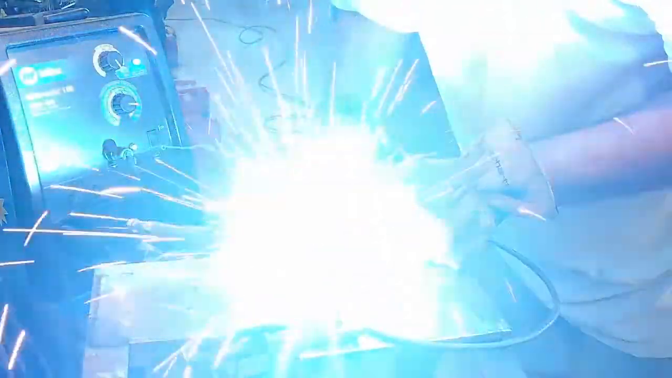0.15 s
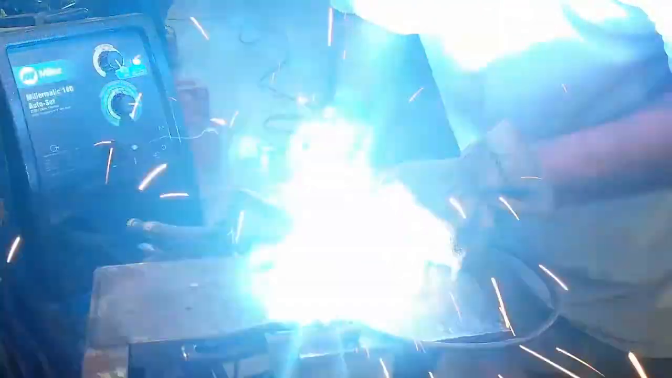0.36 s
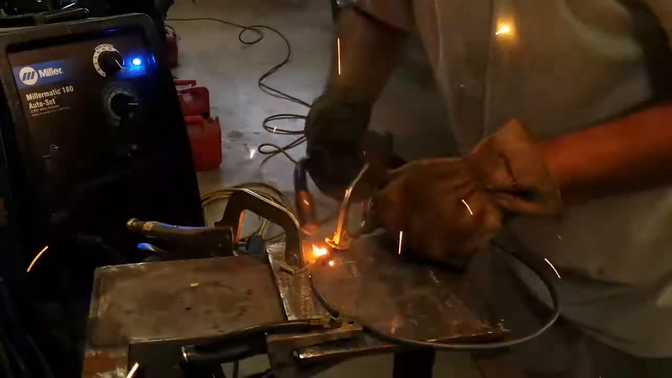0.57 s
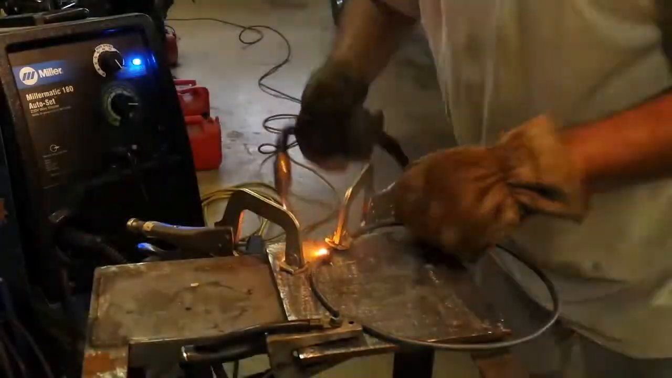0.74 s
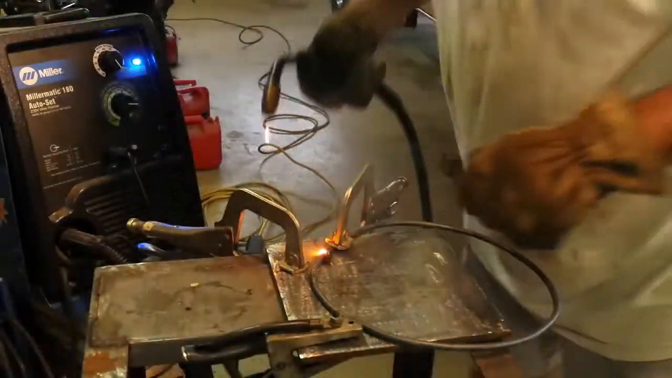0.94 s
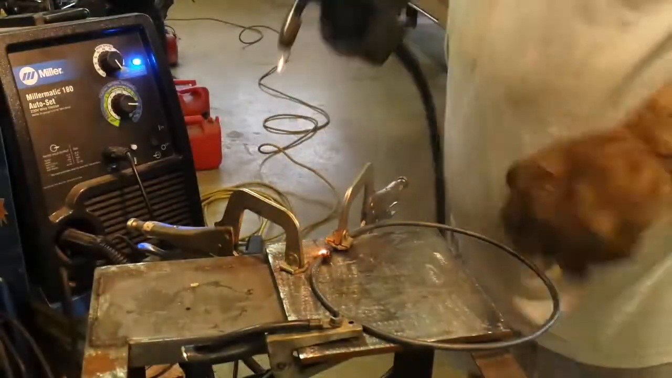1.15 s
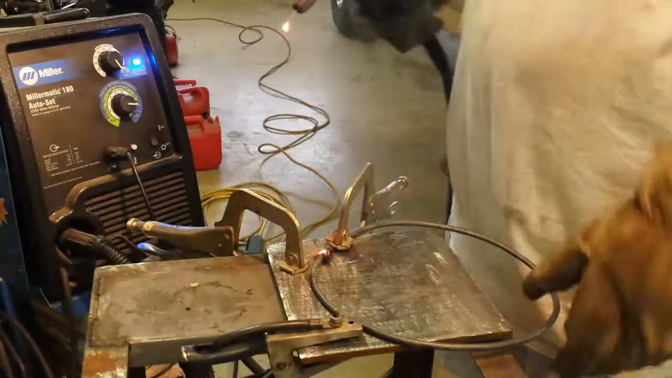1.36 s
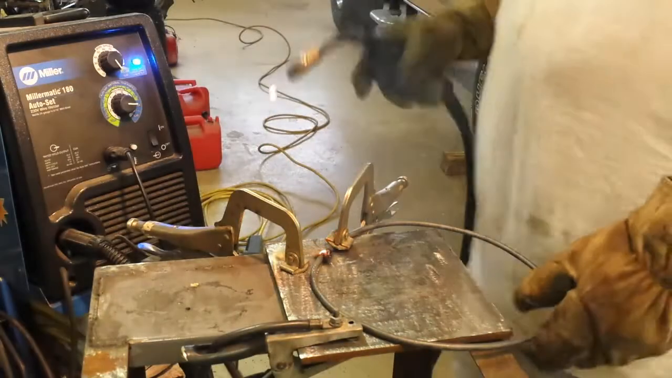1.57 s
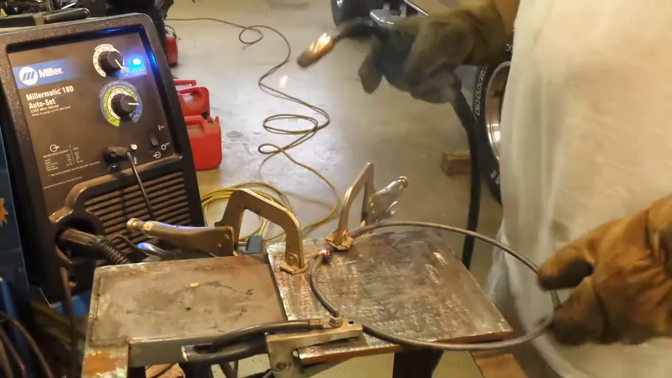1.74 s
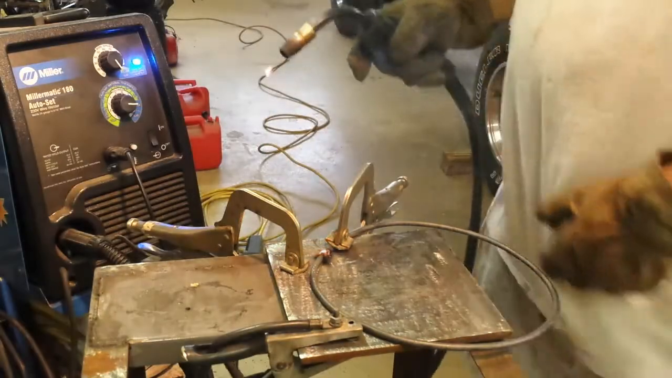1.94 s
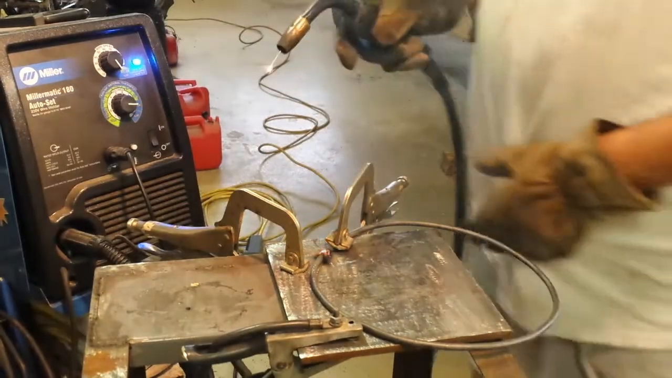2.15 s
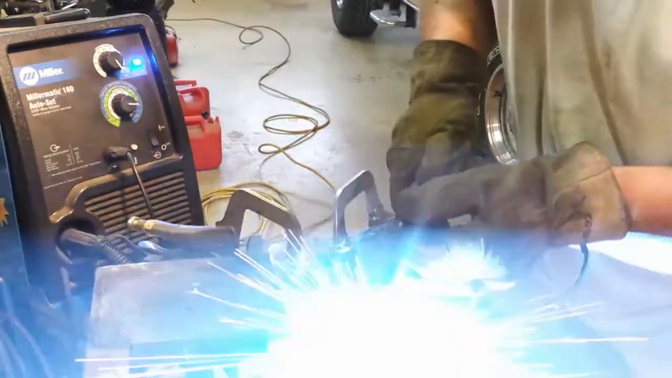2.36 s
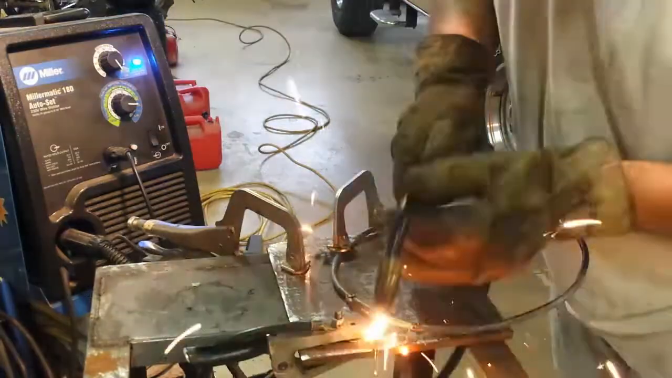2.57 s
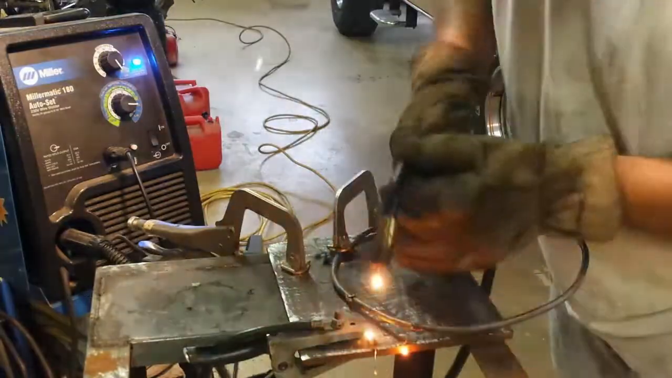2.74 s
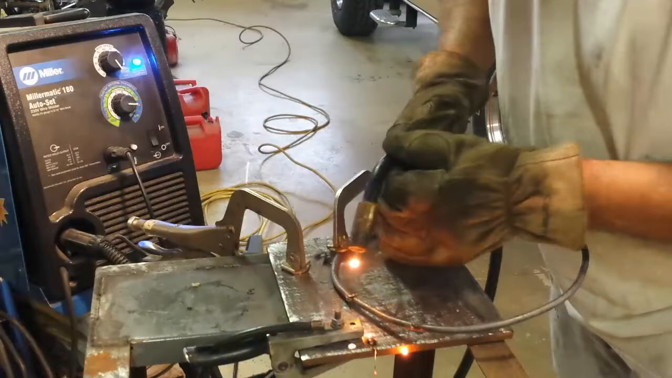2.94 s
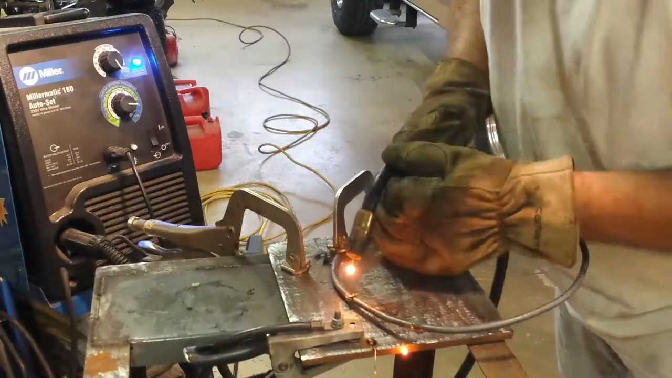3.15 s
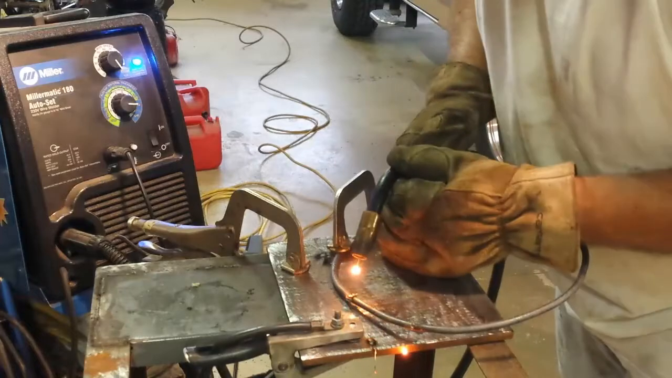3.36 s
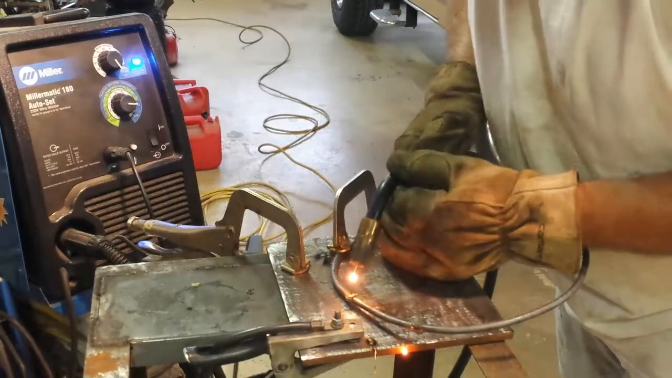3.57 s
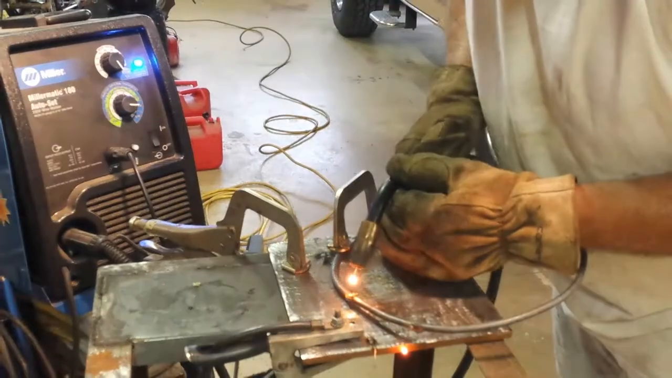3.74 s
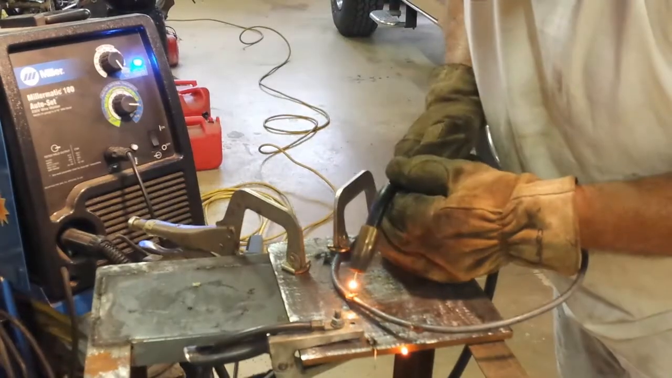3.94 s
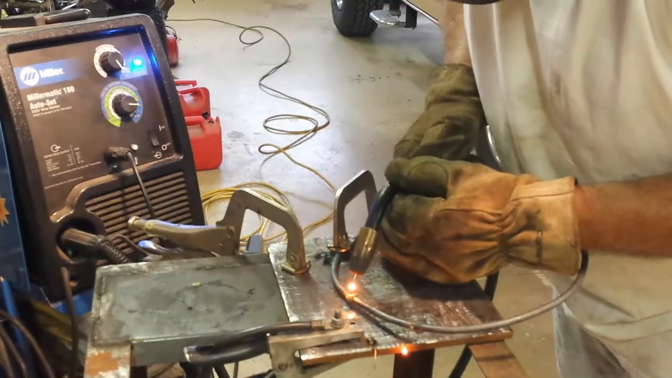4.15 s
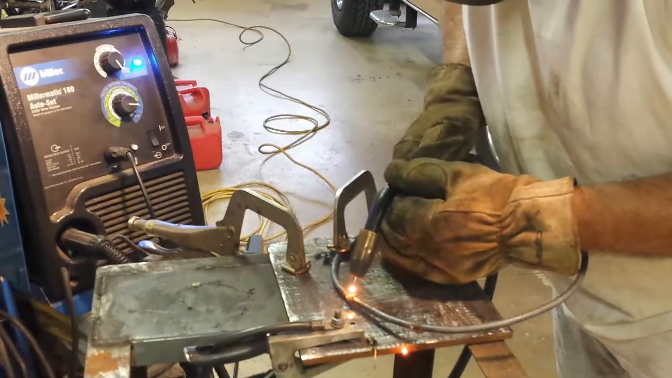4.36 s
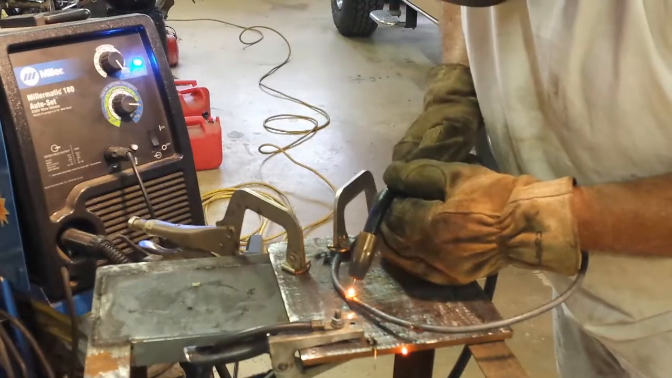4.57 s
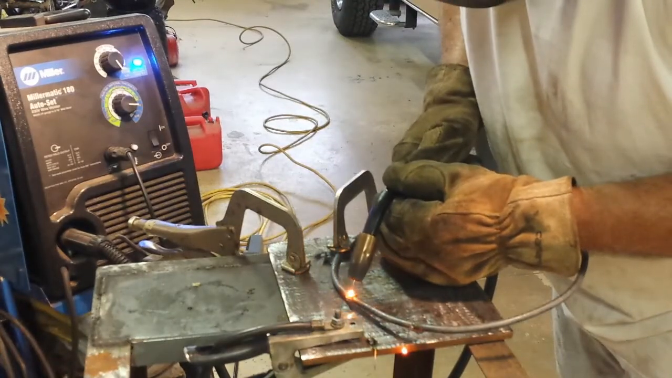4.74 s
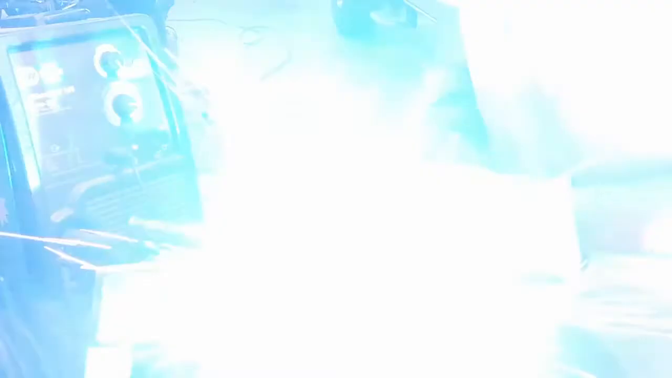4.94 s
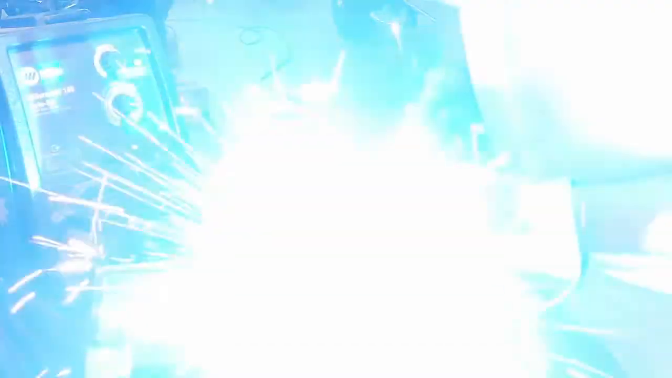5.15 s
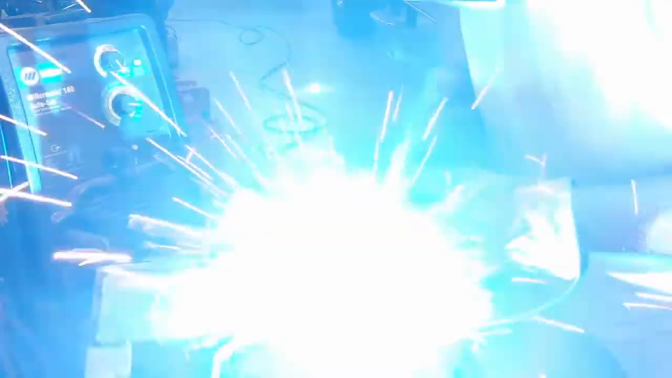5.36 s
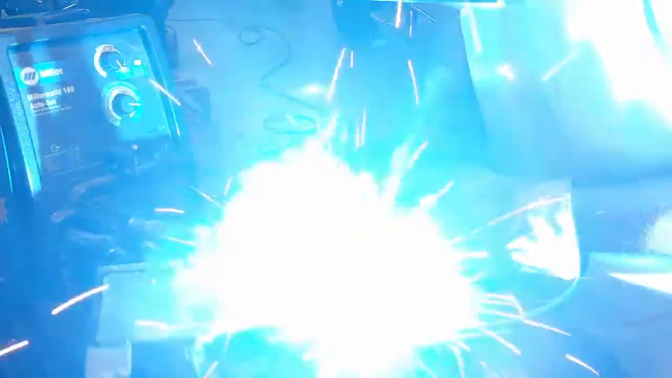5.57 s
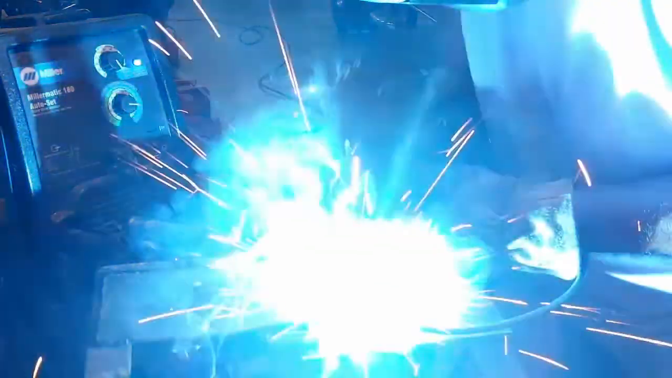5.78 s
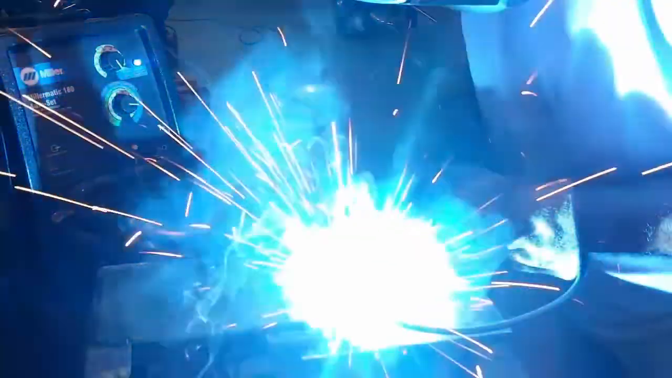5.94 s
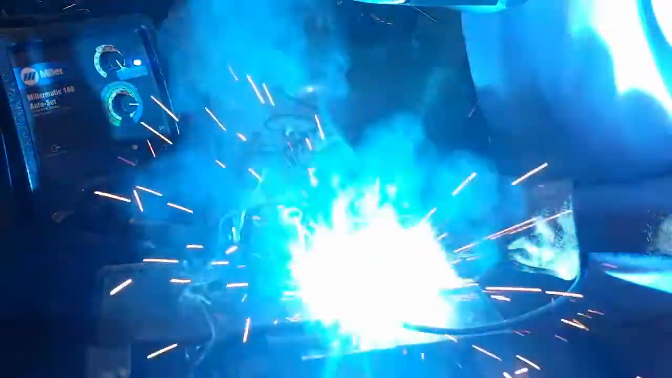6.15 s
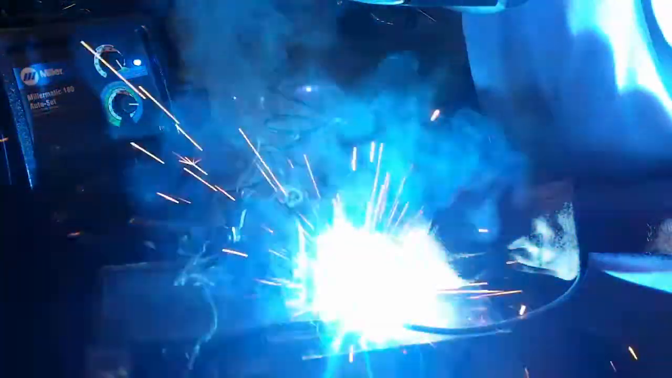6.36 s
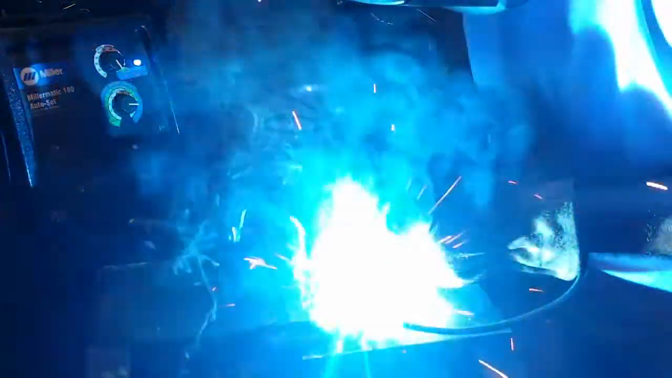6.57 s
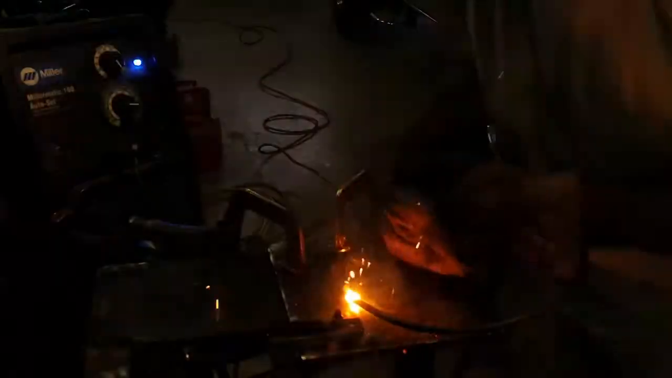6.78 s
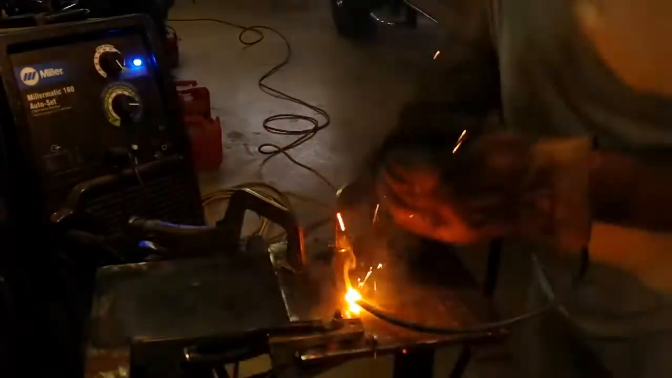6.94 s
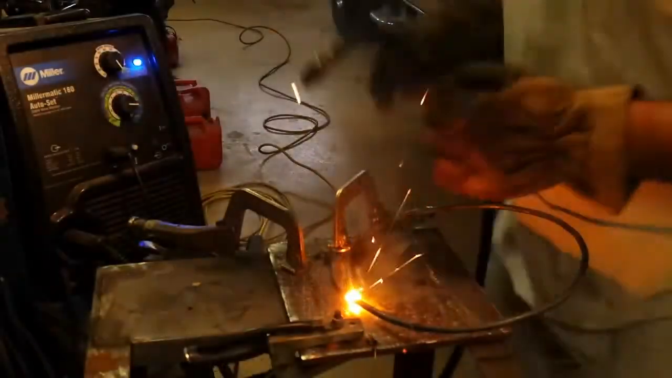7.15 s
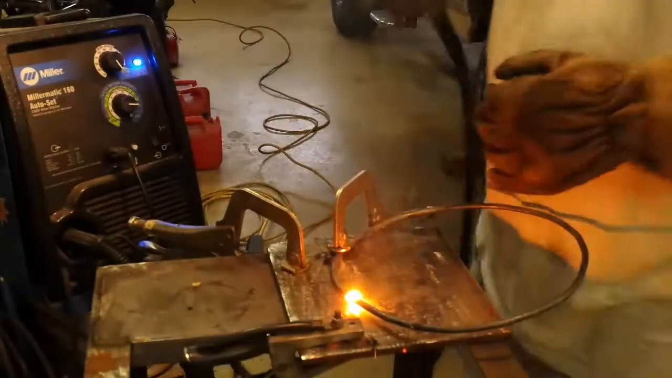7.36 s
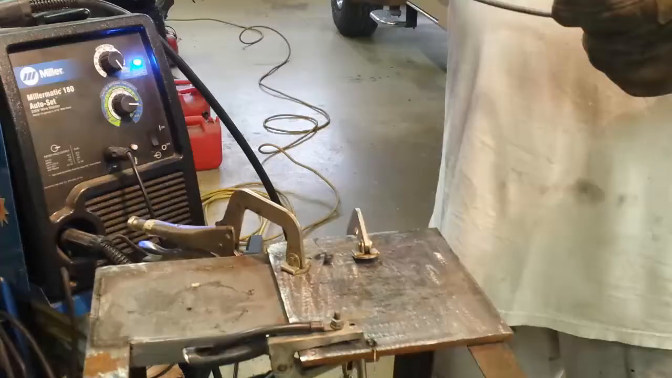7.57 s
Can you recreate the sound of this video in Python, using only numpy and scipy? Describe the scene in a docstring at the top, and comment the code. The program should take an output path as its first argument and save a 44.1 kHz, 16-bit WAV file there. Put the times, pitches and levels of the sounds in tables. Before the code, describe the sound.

Bursts of sharp, sizzling welding crackle, two brief and one longer, over the low hum of the welder's fan.

```python
"""A garage, where a MIG welder lays two beads and a short tack on steel rod.
The wire keeps shorting into the molten pool and blowing clear: loud pops over a running crackle,
with the arc sizzling in between. The steel table and the room ring on, and a few pops in the
second bead also thump the microphone. The welder's cooling fan hums throughout; gain control
lifts it in the pauses."""
import sys
import numpy as np
from scipy import signal
from scipy.fft import rfft, irfft, next_fast_len
from scipy.io import wavfile
from scipy.ndimage import uniform_filter1d, minimum_filter1d, map_coordinates

SR = 44100
rng = np.random.default_rng(int(sys.argv[2]) if len(sys.argv) > 2 else 0)


def dump(signal):
    """Clip the signal to [-1, 1] and save it as 16-bit WAV at the path in sys.argv[1]."""
    limited = np.clip(np.atleast_2d(signal).T, -1, 1)
    pcm = np.round(limited * 32767).astype(np.int16)
    wavfile.write(sys.argv[1], SR, pcm)


N = 335601
TIME = np.arange(N) / SR
TOP_HZ = 15650

# Air rushing through the fan. Each row: frequency in Hz, relative level in dB.
FAN_AIR = [(25, -97), (110, -72), (145, -68), (185, -53), (320, -64), (700, -71), (1300, -75.5),
           (1900, -77), (2300, -83.5), (4200, -87.5), (6200, -88), (10000, -102), (15000, -108)]
# Resonances of the welder's case. Each row: centre in Hz, width in Hz, boost in dB.
CASE_RESONANCES = [(206, 21, -2), (379, 27, 2.5), (529, 31, 8), (841, 110, 9), (960, 55, 4)]
# Blade and motor hum. Each row: pitch in Hz, level in dB before the fan's fader.
FAN_TONES = [(120, -82), (206.7, -51.5), (413.4, -66), (620.1, -67.5), (893.6, -68)]
# The fan's fader ride. Each row: time in seconds, gain in dB.
FAN_FADER = [(0, -1), (.7, -1), (1.3, 0), (2.3, 1.5), (2.9, 3), (3.4, 1), (4.0, 1), (4.85, 2.5), (5.3, -5),
             (6.8, -4), (7.2, 1), (7.6, 2)]
# The garage's tail. Each row: frequency in Hz, seconds to fall 60 dB.
ROOM_DECAY = [(200, 2), (1300, .5), (3500, .5), (6500, 0.48), (10000, 0.35), (15000, 0.22)]
# The tone of that tail. Each row: frequency in Hz, gain in dB.
ROOM_COLOUR = [(100, -16.5), (400, -4), (1200, -5.5), (2200, -7), (3200, -9), (5000, -13), (6000, -9),
               (7400, -11), (10000, -4), (15000, -10.5)]
# Ring of the table and clamps. Each row: pitch in Hz, relative level in dB, seconds to fall 60 dB.
STEEL_MODES = [(3216, 2, .5), (4284, -6, .3), (4877, -3, .3), (5616, -1, .35), (5771, -4, .35),
               (6035, -2, .35), (6422, -3, .3)]
# Dull handling knocks. Each row: start in seconds, level in dB, pitch in Hz, seconds to fall 60 dB.
KNOCKS = [(2.255, -52, 69.3, 0.092)]
# A few pops in the second bead thump the microphone. Each row: start in seconds, relative level in dB.
MIC_THUMPS = [(5.034, -17.5), (5.055, -22.5), (5.0784, -11.5), (5.585, -19.5), (6.176, -16.5)]
# How the arc sits on the work. Each row: time in seconds, close echo delay in ms, echo share,
# brightness in dB per octave, body in dB.
GUN_POSITIONS = [(0, .38, 0.51, 0.65, 7), (0.499, 0.36, 0.25, 0.9, 0.5), (2.4, .39, 0.29, 0.35, -7),
                 (2.6, .4, 0.42, -3.5, -8.5), (4.88, 0.44, 0.22, -2.2, -1.5), (5.001, 0.433, 0.23, 1.06, 0),
                 (5.7, 0.41, 0.19, -0.5, 2), (6.7, 0.4, 0.31, 0.33, 0)]
# The arc's basic tone. Each row: frequency in Hz, relative level in dB.
ARC_COLOUR = [(60, -7.5), (450, -2.5), (1100, 0.5), (2050, -2.5), (2800, 5), (3600, 2), (5000, 7.5),
              (6700, 9.5), (7500, 4), (10000, -1.5), (11200, -7), (13200, -6.5), (14600, -0.5), (15600, -7)]
# Extra EQ that sets the hiss apart from the pops. Each row: frequency in Hz, boost in dB.
HISS_COLOUR = [(200, 1), (1200, 1.5), (2300, 1), (3100, 3), (4300, 1.5), (6500, 0.5), (10000, 3.5),
               (12000, 3), (14800, 1.5)]
# The burning arc's sizzle, one list a weld. Each row: time in seconds, relative level in dB.
SIZZLE_LEVELS = [
    [(0, -22.5), (.2, -32), (.35, -27.5)],
    [(2.44, -24), (2.46, -20.5), (2.5, -38)],
    [(4.957, -23.5), (5.1, -29.5), (5.45, -26.5), (5.8, -40.5), (6.2, -28.5), (6.69, -33.5)],
]
# Spurts of hiss. Each row: start in seconds, level in dB, rise in seconds, seconds to fall 60 dB.
FLARES = [(.334, -31, 0.014, 0.22), (0.465, -31.5, 0.0011, 0.22), (2.417, -40, .004, 0.064),
          (2.458, -21, 0.013, 0.096), (2.527, -29.5, 0.0042, 0.3), (4.879, -35, 0.0079, 0.36),
          (6.178, -25, 0.0024, 0.22), (7.44, -61.5, 0.026, 0.77)]
# Running crackle, one list a bead. Each row: time in seconds, pops per second, base level in dB.
BEADS = [
    [(0, 124, -18), (.08, 98.6, -13.5), (.18, 115, -11.5), (.333, 98, -15.5)],
    [(4.9592, 119, -18), (5.15, 125, -15), (5.42, 122, -14), (5.47, 91, -13.5), (5.61, 85.4, -14.5),
     (5.67, 156, -17), (5.75, 83.4, -15.5), (5.93, 80, -14.5), (6.0, 121, -16.5), (6.14, 133, -18.5),
     (6.21, 79, -15.5), (6.38, 119, -18.5), (6.69, 126, -18.5)],
]
# How roughly each bead runs. Each row: spread of the gaps as a share, spread of the levels in dB,
# level of the wire's touch tick against its pop in dB.
BEAD_ROUGHNESS = [(0.046, 0.8, -15), (.16, 1.604, -8.5)]
# The wire stubs into the pool and blows clear. Each row: start in seconds, relative level in dB,
# lull in the crackle before it in ms.
LOUD_POPS = [(.1095, -11, 8.6), (0.2019, -10, 7.1), (.266, -11.5, 11.5), (0.2843, -9, 7.4),
             (0.3167, -11, 11), (.333, -10, 15), (.4649, -10, 130), (2.4363, -11.5, 19), (2.4449, -21.5, 8),
             (2.4505, -6, 6), (2.5267, -7.5, 75), (4.9591, -4, 92), (5.001, -6.5, 33), (5.0329, -5.5, 7.9),
             (5.0555, -6.5, 22), (5.0782, -7, 6.8), (5.1, -6.5, 8.8), (5.2158, -8, 16), (5.2352, -10, 21),
             (5.254, -7, 8.7), (5.3475, -5, 26), (5.3752, -8, 31), (5.5845, -9.5, 6.1), (5.6354, -9, 11.2),
             (5.713, -9, 8.5), (5.8594, -10.5, 5.8), (5.976, -11, 7), (6.052, -11.5, 8.4),
             (6.0937, -14.5, 12.5), (6.1762, -6.5, 18), (6.2044, -13, 16), (6.2206, -13, 16),
             (6.3004, -9.5, 11.8), (6.3183, -13, 18), (6.3463, -12.5, 23.5), (6.4303, -14.5, 11.2),
             (6.4685, -9, 35), (6.486, -10, 16.5), (6.5714, -11.5, 17), (6.6187, -10.5, 10.8),
             (6.677, -21.5, 5.9)]


def gain_of(db):
    """Decibels to a factor."""
    return 10 ** (np.asarray(db) / 20)


def unit_rms(x):
    """Scales to rms 1."""
    return x / np.sqrt(np.mean(x ** 2) + 1e-20)


def curve_at(points, hz):
    """Reads a curve along a log frequency axis."""
    freqs, values = np.transpose(points)
    return np.interp(np.log(hz + 1), np.log(freqs + 1), values)


def bell(hz, centre, width, db):
    """An EQ bell in dB, with centre and width in Hz."""
    return db / (1 + (2 * (hz - centre) / width) ** 2)


def add(mix, start, sound):
    """Mixes a sound in at start seconds."""
    part = mix[max(round(start * SR), 0):][:len(sound)]
    part += sound[:len(part)]


def noise(db_at, count=N):
    """Noise of rms 1 with the spectrum db_at(Hz)."""
    size = 2 * next_fast_len(count // 2 + 1, True)
    colour = gain_of(db_at(np.fft.rfftfreq(size, 1 / SR)))
    return unit_rms(irfft(rfft(rng.standard_normal(size)) * colour)[:count])


def drift(rate_hz):
    """A random wobble of rms 1, rolling off above rate_hz."""
    return noise(lambda hz: -10 * np.log10(1 + (hz / rate_hz) ** 6))


def minimum_phase(db):
    """Filter spectra for rows of dB gains: sharp front, ringing behind."""
    log_gain = np.log(gain_of(np.concatenate([db, db[:, -2:0:-1]], 1)))
    return np.exp(np.conj(signal.hilbert(log_gain, axis=1)))[:, :db.shape[1]]


def fan(air_db=-50, flutter_db=0.48, waver=.003, throb_db=1.9):
    """The bed: turbulent air in a resonant case, with wavering blade and motor tones."""
    air = noise(lambda hz: curve_at(FAN_AIR, hz) + sum(bell(hz, *row) for row in CASE_RESONANCES))
    phase_per_hz = 2 * np.pi * np.cumsum(1 + waver * drift(rate_hz=4)) / SR
    hum = sum(gain_of(db + throb_db * drift(rate_hz=10)) * np.sqrt(2) * np.sin(hz * phase_per_hz)
              for hz, db in FAN_TONES)
    air *= gain_of(air_db + flutter_db * drift(rate_hz=40))
    return (air + hum) * gain_of(np.interp(TIME, *np.transpose(FAN_FADER)))


def garage(x, predelay_s=0.00077, build_s=0.005, density=.12):
    """Dense reflections build up and die away, the treble soonest."""
    t = TIME[:SR * 3 // 4]
    reflections = rng.standard_normal(len(t)) * (rng.random(len(t)) < density)
    reflections *= np.clip((t - predelay_s) / build_s, 0, 1)
    hz, age, bands = signal.stft(unit_rms(reflections) / np.sqrt(SR), SR, nperseg=256)
    decay_rate = np.log(1000) / curve_at(ROOM_DECAY, hz)[:, None]
    bands *= gain_of(curve_at(ROOM_COLOUR, hz))[:, None]
    bands *= np.sqrt(2 * decay_rate) * np.exp(-decay_rate * age)  # same energy, long tail or short
    return signal.oaconvolve(x, signal.istft(bands, SR, nperseg=256)[1])[:N]


def steel(x, send_db=-24):
    """The table and clamps ring faintly under the pops."""
    t = TIME[:SR // 2]
    ring = sum(gain_of(db - 60 * t / t60) * np.sin(2 * np.pi * (hz * t + rng.random()))
               for hz, db, t60 in STEEL_MODES)
    return gain_of(send_db) * signal.oaconvolve(x, ring / np.linalg.norm(ring))[:N]


def thumps(push_s=0.0017, front_s=0.00031):
    """The low end: each mic thump is a short push and a longer suck; handling gives a dull boom."""
    out, t = np.zeros(N), TIME[:SR // 5]
    thump = 2 * (1 - np.exp(-t / front_s)) * (1 - t / push_s) * np.exp(-t / push_s)
    for start, db in MIC_THUMPS:
        add(out, start, gain_of(db) * thump)
    for start, db, hz, t60 in KNOCKS:
        add(out, start, gain_of(db - 60 * t / t60) * np.sin(2 * np.pi * hz * t))
    return out


def close_echo(x):
    """A reflection from close by hollows the direct sound; it shifts as the gun moves."""
    when, echo_ms, share, _, _ = np.transpose(GUN_POSITIONS)
    delayed_index = np.arange(N) - np.interp(TIME, when, echo_ms) * SR / 1000
    return x - np.interp(TIME, when, share) * map_coordinates(x, [delayed_index], order=3)


def arc_colour(at, hz, extra_tilt_db=0):
    """The arc's EQ in dB at a given time: its place on the work sets brightness and body."""
    def hump(centre_hz, octaves):
        return np.exp(-(np.log2((hz + 1) / centre_hz) / octaves) ** 2)
    when, _, _, tilt_db, body_db = np.transpose(GUN_POSITIONS)
    octaves_from_pivot = np.log2(np.maximum(hz, 700) / 5000)
    tilt = (np.interp(at, when, tilt_db) + extra_tilt_db) * octaves_from_pivot
    body = np.interp(at, when, body_db) * hump(centre_hz=1700, octaves=1.6)
    notch = -1.5 * hump(centre_hz=2300, octaves=0.12)  # parts the knock from the fizz
    return curve_at(ARC_COLOUR, hz) + tilt + body + notch


def hiss(at, count):
    """A stretch of the burning arc's noise, coloured for the gun's place at that time."""
    return noise(lambda hz: arc_colour(at, hz) + curve_at(HISS_COLOUR, hz), count)


def flares():
    """Hiss spurts as the arc strikes, flares or dies, and faintly as the gun lifts away."""
    out, t = np.zeros(N), TIME[:SR // 2]
    for start, db, rise, t60 in FLARES:
        envelope = np.minimum(t / rise, 1) * gain_of(db - 60 * np.maximum(t - rise, 0) / t60)
        add(out, start, envelope * hiss(start, len(t)))
    return out


def sizzle(pop_times, relight_s=0.00079, burn_s=0.0095, shorted_db=-9.5, grain_db=5.5):
    """The arc relights and hisses after each pop, then ducks as the wire dips into the pool again."""
    last_pop = pop_times[np.maximum(np.searchsorted(pop_times, TIME) - 1, 0)]
    since_pop = abs(TIME - last_pop)
    alight = (1 - np.exp(-since_pop / relight_s)) * np.exp(-(since_pop / burn_s) ** 2)
    out = np.zeros(N)
    for weld in SIZZLE_LEVELS:
        when, db = np.transpose(weld)
        t = when[0] + TIME[:2 * SR]
        add(out, when[0], np.interp(t, when, gain_of(db), 0, 0) * hiss(when.mean(), len(t)))
    grain = unit_rms(gain_of(grain_db * drift(rate_hz=900)))
    return out * gain_of(shorted_db * (1 - alight)) * grain


def touch_ticks(pop_times, db, lead_ms=2.6, spread=.25):
    """The wire ticks faintly as it shorts into the pool, just ahead of each pop."""
    leads_ms = lead_ms * np.exp(spread * rng.standard_normal(len(pop_times)))
    return pops(pop_times - leads_ms / 1000, db)


def crackle_pattern(bead, gap_spread, spread_db, usual_gap_s=.01, db_per_doubling=-2.5, max_pops=64):
    """Times and levels of small pops: each run follows a loud pop and stops at the next lull."""
    when, rate, level_db = np.transpose(bead)
    cycles = np.cumsum(np.interp(TIME, when, rate)) / SR
    loud_times, _, lull_ms = np.transpose(LOUD_POPS)
    starts = np.clip(np.append(0, loud_times), when[0], when[-1])
    ends = np.clip(np.append(loud_times - lull_ms / 1000, when[-1]), when[0], when[-1])
    rows = []
    for start, end in zip(starts, ends):
        timing, strength = rng.standard_normal((2, max_pops))
        first, last = np.interp([start, end], TIME, cycles)
        count = min(round(last - first), max_pops)
        if count > 0:
            steps = np.cumsum(np.exp(gap_spread * timing[:count]))
            times = np.interp(first + (last - first) * steps / steps[-1], cycles, TIME)
            gaps = np.diff(times, prepend=start)
            wait_db = db_per_doubling * np.log2(gaps / usual_gap_s)  # longer wait, softer pop
            rows += zip(times, np.interp(times, when, level_db) + wait_db + spread_db * strength[:count])
    return rows


def smear(hz, pole=0.47, treble_lag_ms=0.25):
    """An all-pass that makes a snap swing both ways, with the top of the treble trailing."""
    delay = np.exp(-2j * np.pi * hz / SR)
    swing = (delay - pole) / (1 - pole * delay)
    swing *= (delay ** 2 - pole ** 2) / (1 - (pole * delay) ** 2)
    return swing * np.exp(-1j * np.pi * treble_lag_ms / 1000 * hz * (hz / TOP_HZ) ** 2)


def pops(times, db, spit_db=-16, spit_ms=.7, usual_db=-15, tilt_spread_db=0.15, trim_db=-0.95):
    """The molten bridge bursts: a snap and a spit of droplets, each pop a bit brighter or duller."""
    size, jitter_s = 1024, 5e-5
    ms, hz = TIME[:size] * 1000, np.fft.rfftfreq(size, 1 / SR)
    chance = rng.standard_normal((len(times), size + 1))
    spit_decay_ms = spit_ms * 2 ** ((db[:, None] - usual_db) / 9)  # a bigger drop spits longer
    snap = ms == 0
    spit = gain_of(spit_db) * np.exp(-ms / spit_decay_ms) * chance[:, 1:]
    colour = arc_colour(times[:, None], hz, -tilt_spread_db * chance[:, :1])
    nozzle_ring = bell(hz, centre=6250, width=1200, db=2.0)
    bursts = irfft(rfft(snap + spit) * minimum_phase(colour + nozzle_ring) * smear(hz))
    bursts *= np.sqrt(SR / 1000) / np.linalg.norm(bursts, axis=1, keepdims=True)  # as 1 ms at rms 1
    out = np.zeros(N)
    for start, gain, burst in zip(times, gain_of(db + trim_db), bursts):
        add(out, start + rng.uniform(-jitter_s, jitter_s), gain * burst)
    return out


def scene():
    """Loud pops, crackle and sizzle ring in the steel and the room, over the fan."""
    pop_times, loud_db, _ = np.transpose(LOUD_POPS)
    arc = pops(pop_times, loud_db) + flares()
    for bead, (gap_spread, spread_db, touch_db) in zip(BEADS, BEAD_ROUGHNESS):
        times, db = np.transpose(crackle_pattern(bead, gap_spread, spread_db))
        arc += pops(times, db) + touch_ticks(times, db + touch_db)
        pop_times = np.append(pop_times, times)
    arc += sizzle(np.sort(pop_times))
    return (close_echo(arc) + steel(arc) + garage(arc) + thumps() + fan())[None]


def gain_control(x, target_db=-11, max_lift_db=14, hold_s=0.72, recover_s=0.58, attack_s=0.0036):
    """Lifts quiet sound; a loud peak ducks the gain, which holds and then swells back."""
    def trailing(smoother, values, seconds):
        width = int(seconds * SR) // 2 * 2 + 1
        return smoother(values, width, origin=width // 2, mode="nearest")
    allowed_db = np.clip(target_db - 20 * np.log10(abs(x) + 1e-9), 0, max_lift_db)
    allowed_db[0] = 0  # the gain starts low
    held_db = trailing(minimum_filter1d, allowed_db, hold_s)
    lift_db = np.minimum(held_db, trailing(uniform_filter1d, held_db, recover_s))
    attack = int(attack_s * SR)  # a centred window: it looks ahead, so the duck is smooth
    return x * gain_of(uniform_filter1d(minimum_filter1d(lift_db, attack), attack))


def record(dry):
    """The phone's chain: gain control, overload on the biggest pops, then a steep low-pass."""
    clipped = np.clip(gain_control(dry[0]), -1, 1)
    low_pass = signal.firwin(255, TOP_HZ, window=("kaiser", 8), fs=SR)
    return signal.oaconvolve(clipped, low_pass, "same")[None]


dry = scene()
out = record(dry)
dump(out)
```